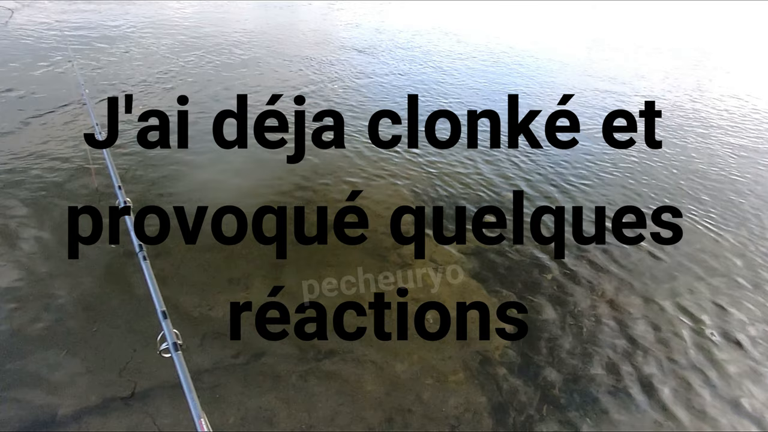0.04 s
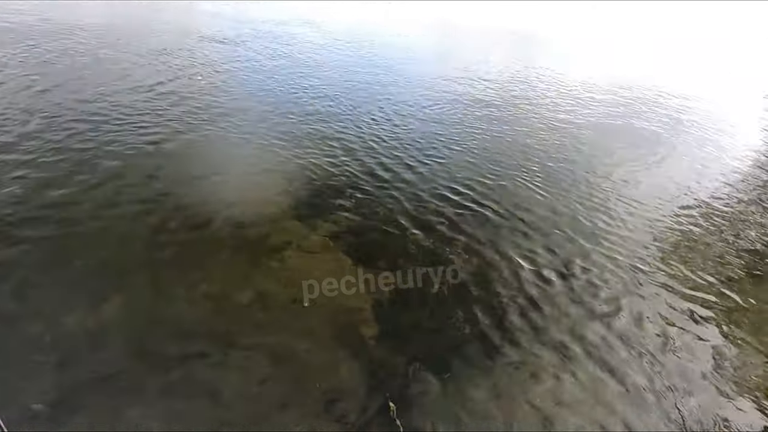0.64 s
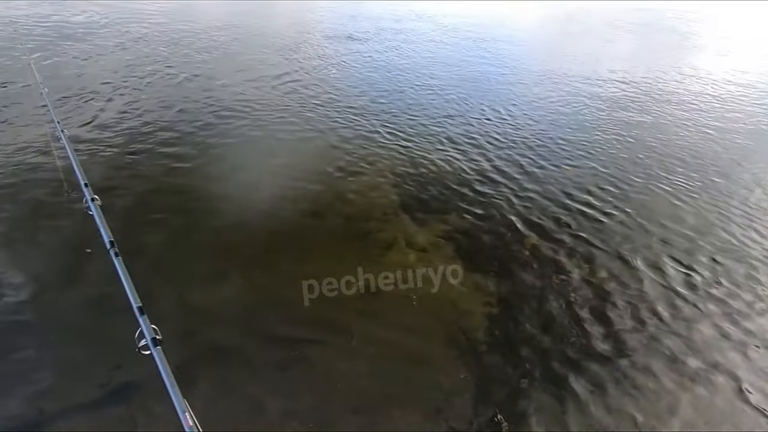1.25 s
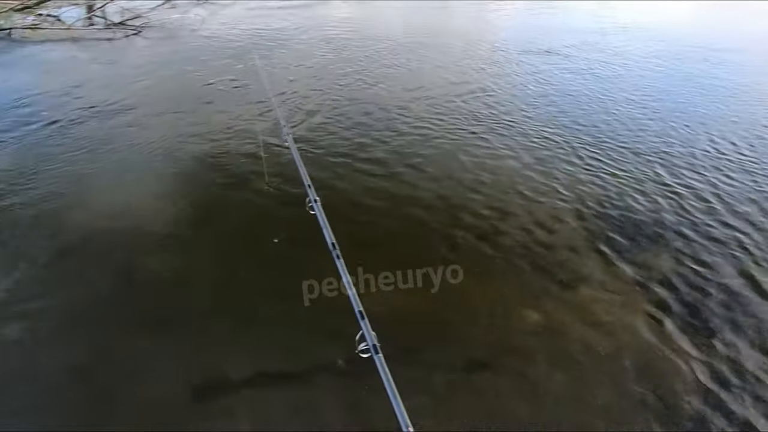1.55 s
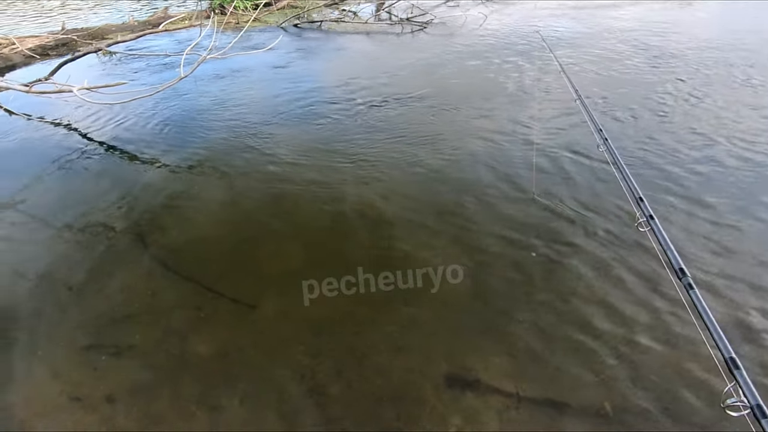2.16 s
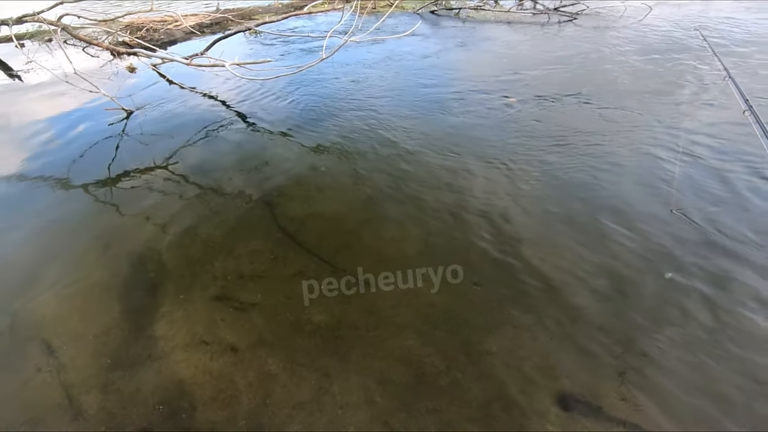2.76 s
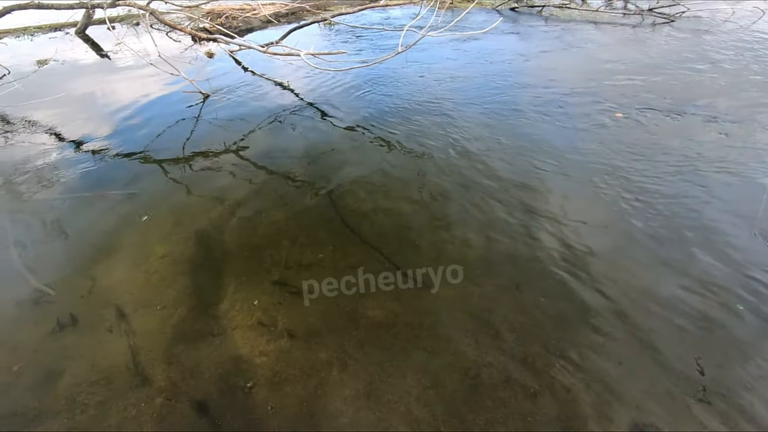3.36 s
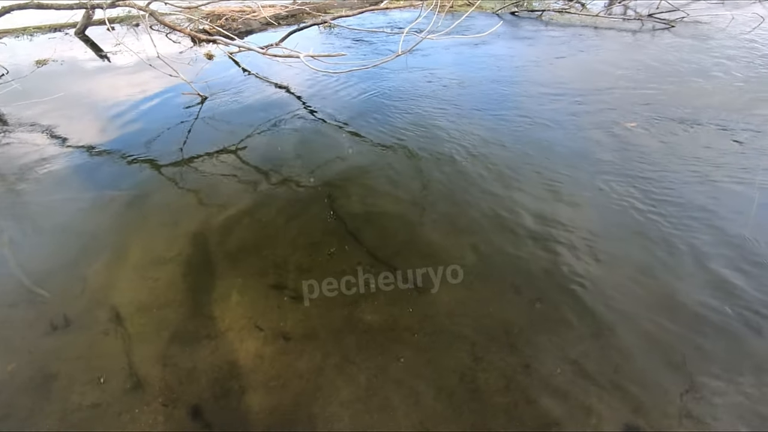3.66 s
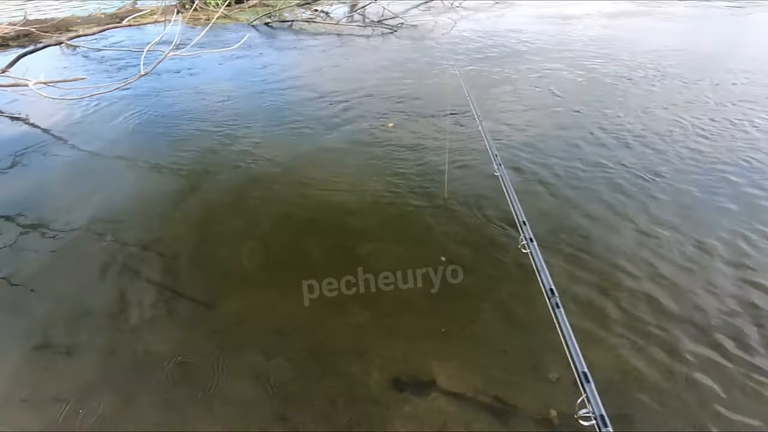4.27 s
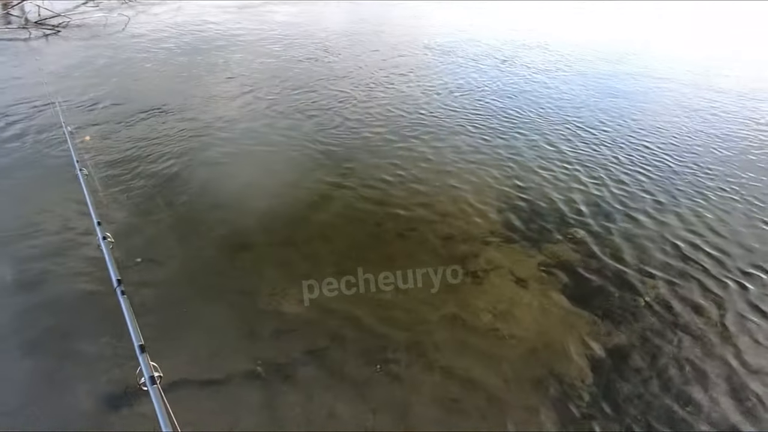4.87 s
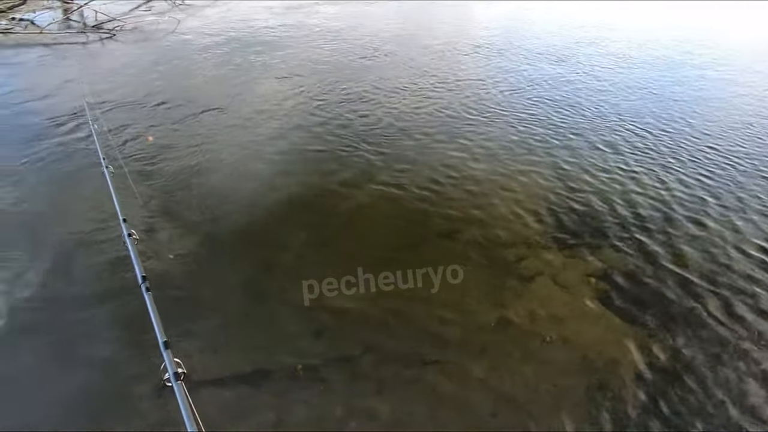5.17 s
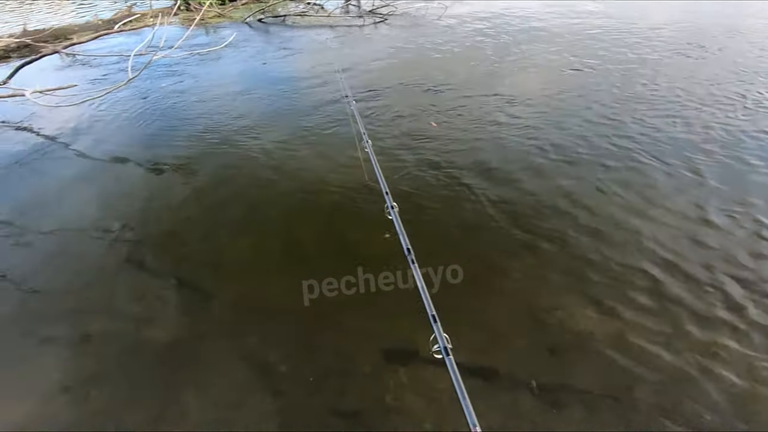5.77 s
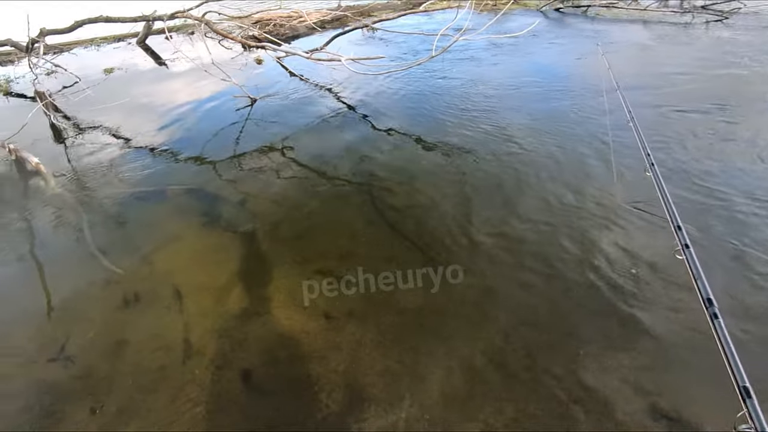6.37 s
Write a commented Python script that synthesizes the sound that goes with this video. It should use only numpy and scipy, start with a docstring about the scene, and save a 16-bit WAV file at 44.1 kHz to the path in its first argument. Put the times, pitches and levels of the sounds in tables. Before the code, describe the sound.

A fishing clonk strikes river water four times with loud, hollow pops and gurgles, over a steady current and light wind.

```python
"""A river rushes in after a brief silence, and gusts of wind brush the microphone on the bank.
Then a catfish clonk, a blade for luring fish, is struck into the water four times. Each time a low hum
swells into a crack, as a dragged-down pocket of air tears open and pinches off as a ringing bubble.
The water gurgles, drops fall back, and the bank gives a faint echo.
Every clonk overloads the microphone and makes its automatic volume control dip."""
import sys
import numpy as np
from scipy import signal
from scipy.fft import rfft, irfft, next_fast_len
from scipy.io import wavfile
from scipy.ndimage import uniform_filter1d

SR = 44100
rng = np.random.default_rng(int(sys.argv[2]) if len(sys.argv) > 2 else 0)


def unload_wav(signal):
    """Save mono or channel-first audio to the path in sys.argv[1] as 16-bit WAV at rate SR, clipped to [-1, 1]."""
    wavfile.write(
        sys.argv[1],
        SR,
        np.round(np.clip(np.atleast_2d(signal).T, -1, 1) * 32767).astype(np.int16),
    )


N = 291845
TIME = np.arange(N) / SR


def amp(db):
    """Turns decibels into a gain."""
    return 10 ** (np.asarray(db) / 20)


def unit(x):
    """Scales a signal to an average (rms) size of 1."""
    return x / np.sqrt(np.mean(x ** 2) + 1e-20)


def level_at(tone, hz):
    """Looks up the level in dB at each frequency of a tone table."""
    f, db = np.transpose(tone)
    return np.interp(np.log(hz + 1), np.log(f), db)


def add(mix, s, sound):
    """Mixes a sound in at s seconds."""
    part = mix[max(round(s * SR), 0):][:len(sound)]
    part += sound[:len(part)]


def noise(tone, size):
    """Noise of rms 1, coloured by a tone table."""
    hz = np.fft.rfftfreq(size, 1 / SR)
    phases = np.exp(2j * np.pi * rng.random(len(hz)))
    return unit(irfft(amp(level_at(tone, hz)) * phases, size))


# How loud the river's rush is over time, dipping near 2.6 s and 4.3 s: t/s, level/dB
RIVER_LEVELS = [(1.3, -28), (2.1, -29), (2.6, -33.5), (3.6, -30.5), (4.3, -35.5), (4.9, -29.5),
                (6.6, -28.5)]
# The tone of rushing water: f/Hz, level/dB
RIVER_TONE = [(25, -0.5), (110, -16), (150, 1), (205, 0), (290, -7), (450, -13.5), (600, -16), (740, -11.5),
              (1000, -17), (1350, -14.5), (2000, -16), (3100, -12.5), (4400, -17.5), (14000, -36)]
# How the microphone's small opening colours the treble: f/Hz, level/dB
MIC_TONE = [(4500, 0.5), (5800, -7.5), (7000, -1.5), (7500, -5.5), (8700, 0.5), (9600, -13.5), (10500, -4),
            (13400, -19.5), (14300, -24), (16500, -34)]


def river(patchy_db=1.15, lumpy_db=3.0, roar_hz=300):
    """The current rushes in drifting patches; its low roar comes in lumps."""
    frames, hz = N // 256 + 5, np.fft.rfftfreq(1024, 1 / SR)
    real, imag, patches = rng.standard_normal((3, frames, len(hz)))
    patches = uniform_filter1d(patches, size=14, axis=0)  # smooth over time
    patches = unit(uniform_filter1d(patches, size=12, axis=1))  # and over pitch
    lumps = unit(uniform_filter1d(rng.standard_normal(frames), size=14))
    roar = lumps[:, None] * np.exp(-(hz / roar_hz) ** 2)
    spectra = (real + 1j * imag) * amp(patchy_db * patches + lumpy_db * roar)
    rush = signal.istft(spectra.T, nperseg=1024, noverlap=768)[1][:N]
    size = next_fast_len(N)
    hz = np.fft.rfftfreq(size, 1 / SR)
    colour = amp(level_at(RIVER_TONE, hz) + level_at(MIC_TONE, hz))
    rush = irfft(rfft(rush, size) * colour, size)[:N]
    return unit(rush) * amp(np.interp(TIME, *np.transpose(RIVER_LEVELS)))


# Puffs of wind: t/s, spread/s, level/dB
GUSTS = [(.59, 0.048, -21.5), (.70, 0.018, -20), (1.70, .02, -29), (1.85, .019, -25), (4.62, 0.047, -22.5),
         (4.78, 0.07, -17), (5.16, 0.042, -26.5)]
# The tone of their rumble: f/Hz, level/dB
WIND_TONE = [(15, -10.5), (35, 1), (75, -3), (130, -20), (300, -29.5), (1000, -62), (4000, -90)]


def wind():
    """Each gust rumbles on the microphone, swelling and fading smoothly."""
    swells = sum(amp(db) * np.exp(-.5 * ((TIME - s) / spread) ** 2) for s, spread, db in GUSTS)
    return swells * noise(WIND_TONE, N)


def bubble(hz, t60, rise, onset_cycles=1.07):
    """A bubble rings, climbing by `rise` octaves a second and fading by 60 dB in t60 seconds."""
    t = np.arange(0, t60, 1 / SR)
    cycles = np.cumsum(hz * 2 ** (rise * t)) / SR
    onset = 1 - np.exp(-cycles / onset_cycles)
    return np.sin(2 * np.pi * cycles) * amp(-60 * t / t60) * onset


def wet_hiss(db, centre_hz, t60, octaves=0.28, onset_s=0.0012):
    """A short hiss of splashing water, coloured by the microphone's opening."""
    t = np.arange(4096) / SR
    hz = np.geomspace(100, SR / 2, num=80)
    band_db = level_at(MIC_TONE, hz) - 3 * np.log2(hz / centre_hz) ** 2 / octaves
    envelope = amp(db - 60 * t / t60) * (1 - np.exp(-t / onset_s))
    return envelope * noise(np.column_stack([hz, band_db]), len(t))


# Single bubbles that stand out: t/s, f/Hz, level/dB, rise/(octaves per s)
PLOPS = [(0.563, 1500, -22, 6.2), (.936, 510, -19, 29), (1.377, 1250, -2.5, 15), (1.426, 1530, -8, 18),
         (1.431, 2280, -4, 27), (1.548, 2340, -8, 8), (1.579, 322, -12.5, 2.6), (1.66, 805, -9.5, 24),
         (1.680, 427, -11, 19), (1.713, 424, -11.5, 16), (1.738, 472, -13.5, 30), (1.741, 820, -13, 22),
         (1.846, 1920, -13.5, 7.8), (2.357, 1020, -4.5, 4.2), (2.388, 1040, -11, 17), (2.401, 1350, -5, 7),
         (2.447, 1393, -10, 7.4), (2.451, 730, -11, 13), (2.47, 944, -11.5, 9), (2.487, 690, -12, 7.6),
         (2.555, 412, -11.5, 14.8), (3.117, 2400, -12.5, 8), (3.177, 1018, -8, 2.8),
         (3.209, 1135, -4.5, 9.9), (3.242, 705, -7.5, 5), (3.298, 593, -16, 1.8), (3.325, 602, -14, 2.2),
         (4.083, 954, -11.5, 12), (4.230, 695, -17, 1.4), (4.344, 2750, -20.5, 7), (4.4, 1420, -15, 20)]


def plops(waver=0.51, waver_hz=90, tick_db=-17.0):
    """Each larger bubble breaks off with a wet tick and rings; the heaving surface makes it waver."""
    out = np.zeros(N)
    for s, hz, db, rise in PLOPS:
        # higher or faster-rising notes die sooner
        t60 = 0.048 * (hz / 1000) ** -0.76 * (max(rise, 1) / 10) ** -0.25
        add(out, s, amp(db) * bubble(hz, t60, rise))
        add(out, s, wet_hiss(db + tick_db, 2 * hz, t60=0.015))
    heave = noise([(waver_hz, 0), (waver_hz * 4, -40), (SR, -120)], N)
    return out * (1 + waver * heave)


def bank_echo(sound, echo_db=-27, t60=0.74, delay_s=0.0324, band_hz=(300, 900)):
    """The bank and its trees scatter a faint, dull echo."""
    t = np.arange(SR // 2) / SR
    echoes = rng.standard_normal(len(t)) * amp(-60 * t / t60) * (t > delay_s)
    dull = signal.butter(1, band_hz, "bandpass", fs=SR, output="sos")
    echoes = signal.sosfilt(dull, echoes / np.linalg.norm(echoes))
    return amp(echo_db) * signal.fftconvolve(sound, echoes)[:N]


# One row a stroke: crack t/s, blade's head start/s, wait until pinch-off/s,
# hum level/dB, hum f/Hz, crack level/dB, spray level/dB,
# then the sealed bubble's start f/Hz, target f/Hz, glide/s, t60/s, life/s
STROKES = [(1.3606, 0.036, 0.007, 13, 157, 3, -19, 251.6, 952, 0.16, 0.14, 0.088),
           (2.1727, 0.039, .0096, 17, 145.6, 10.5, -18, 308, 633, 0.027, 0.099, 0.057),
           (3.0050, .025, .0184, 12, 136, 10, -19, 264, 560, 0.0048, 0.052, 0.025),
           (3.8468, 0.034, 0.0091, 18, 144, 8.5, -11, 308, 646, 0.027, 0.099, 0.034)]


def strokes(shed_after_s=.043, shed_db=-7):
    """The blade hisses into the water, the air pocket clonks, then it sheds a second bubble."""
    out = np.zeros(N)
    for s, lead_s, *shape in STROKES:
        add(out, s - lead_s, wet_hiss(db=-22, centre_hz=4200, t60=0.049, octaves=0.42))
        t = np.arange(-.08, .25, 1 / SR)  # zero is the moment of the crack
        add(out, s + t[0], clonk(t, *shape))
        add(out, s + shed_after_s, amp(shed_db) * bubble(hz=400, t60=0.082, rise=12))
    return out


def low_hum(t, hz, swell_s=0.0054, overtone=0.224, overtone_ratio=2.03):
    """A low hum near 146 Hz, with a weaker overtone, swells into each crack."""
    angle = 2 * np.pi * hz * t
    notes = np.cos(angle) - overtone * np.cos(overtone_ratio * angle)
    return notes / (1 + np.exp(-t / swell_s))


# The tone of the air pocket tearing open: f/Hz, level/dB
CRACK_TONE = [(100, 7), (550, 2), (1300, -2), (3000, -8), (6000, -22), (14000, -50)]
# The tone of the spray around the crack: f/Hz, level/dB
SPRAY_TONE = [(150, 19.5), (600, 5.5), (1500, 3), (3500, -0.5), (7000, -10.5), (12500, -23), (15000, -42)]


def clonk(t, pinch_s, hum_db, hum_hz, crack_db, spray_db, *ring_shape, spray_s=0.015, churn_db=-12):
    """A hum swells; the air pocket cracks open with churn and spray and closes into a ringing bubble."""
    age = np.maximum(t - pinch_s, 0)
    until_pinch = np.exp(-(age / 0.00046) ** 2)
    hum = amp(hum_db) * low_hum(t, hum_hz)
    churn = amp(crack_db + churn_db) * noise(CRACK_TONE, len(t)) * (t > 0)
    spray = amp(spray_db) * noise(SPRAY_TONE, len(t)) * np.exp(-.5 * (t / spray_s) ** 2)
    sound = (hum + churn + spray) * until_pinch + sealed_bubble(age, *ring_shape)
    size = 240  # the crack lasts about 5 ms
    crack = amp(crack_db) * noise(CRACK_TONE, size) * signal.windows.tukey(size, .5)
    add(sound, -t[0] - size / 2 / SR, crack)
    return sound


def sealed_bubble(age, start_hz, target_hz, glide_s, t60, life_s, db=11.5, snap_db=12, snap_s=0.0035):
    """Trapped air snaps into a note that climbs as it nears the surface and stops when it gets there."""
    hz = target_hz + (start_hz - target_hz) * np.exp(-age / glide_s)
    ring = -np.sin(2 * np.pi * np.cumsum(hz * (age > 0)) / SR)
    underwater = np.exp(-(age / life_s) ** 4)
    snap = np.exp(-(age / snap_s) ** 2)
    return ring * underwater * amp(db - 60 * age / t60 + snap_db * snap)


def swarm(s, spread_s, band_hz, cycles, rise, scatter_db, linger_db, count):
    """Small bubbles crowd around time s; the smaller ones are higher, shorter and fainter."""
    out = np.zeros(N)
    low_hz, high_hz = band_hz
    for when, smallness, strength, glide in rng.random((count, 4)):
        offset = 3.5 * (2 * when - 1)  # up to 3.5 spreads early or late
        hz = low_hz * (high_hz / low_hz) ** smallness
        gain = amp(scatter_db * (2 * strength ** 2 - 0.5) - 3.6 * smallness)
        swell = np.exp(-.5 * offset ** 2) + amp(linger_db)
        add(out, s + offset * spread_s, gain * swell * bubble(hz, cycles / hz, 2 * glide * rise))
    return out


def foam(db=-21, after_s=.08):
    """Foam seethes in the wake of each stroke."""
    return amp(db) * sum(swarm(s + after_s, spread_s=0.036, band_hz=(535, 2980), cycles=19.6, rise=15,
                               scatter_db=5.5, linger_db=-5, count=120) for s, *_ in STROKES)


# The water closing after each stroke: t/s, gulp level/dB, lowest gulp f/Hz
GURGLES = [(1.689, -19, 288), (2.43, -18.5, 367), (3.249, -21.5, 475), (4.12, -25, 379)]


def gurgles(spread_s=0.057, patter_db=-16.5, mist_db=-33, mist_after_s=0.14):
    """The water closes, gulping and pattering; the finest drops land last."""
    out = np.zeros(N)
    for s, gulp_db, low_hz in GURGLES:
        gulp = swarm(s, spread_s, band_hz=(low_hz, 1815), cycles=22.8, rise=18,
                     scatter_db=5.5, linger_db=-19, count=170)
        patter = swarm(s, spread_s, band_hz=(1106, 5210), cycles=21.5, rise=7,
                       scatter_db=1.5, linger_db=-17.5, count=200)
        mist = swarm(s + mist_after_s, spread_s=0.091, band_hz=(4360, 11100), cycles=16, rise=3,
                     scatter_db=1.5, linger_db=-1.5, count=260)
        out += amp(gulp_db) * gulp + amp(patter_db) * patter + amp(mist_db) * mist
    return out


# The larger slops of spray: t/s, level/dB, centre f/Hz
SPLASHES = [(1.661, -23, 2300), (2.375, -17, 2530), (2.549, -23.5, 3330), (3.295, -17.5, 1900),
            (3.402, -16, 3640), (3.436, -13.5, 3620), (3.524, -24.5, 5800), (4.228, -14, 1390)]


def splashes():
    """Spray falls back and hits the river with short hisses."""
    out = np.zeros(N)
    for s, db, hz in SPLASHES:
        add(out, s, wet_hiss(db, hz, t60=0.039))
    return out


def scene():
    """The strokes, the stirred water and their echo, over river and wind."""
    water = strokes() + plops() + foam() + gurgles() + splashes()
    return (water + bank_echo(water) + river() + wind())[None]


def hold_peaks(over_db, release_s):
    """Holds each peak and lets it die away."""
    fade = np.exp(-TIME / release_s)
    return np.maximum.accumulate(over_db / fade) * fade


def record(dry, threshold_db=-6, depth_db=19.5, slow_share=0.35, attack_s=0.016,
           start_s=.479, top_hz=16500):
    """The volume dips too late for each clonk, which distorts; it recovers fast at first, then slowly."""
    sound = dry[0] * (TIME > start_s)
    over_db = np.clip(20 * np.log10(abs(sound) + 1e-9) - threshold_db, 0, depth_db)
    quick_db = hold_peaks(over_db, release_s=0.24)
    slow_db = hold_peaks(over_db, release_s=3)
    dip_db = (1 - slow_share) * quick_db + slow_share * slow_db
    lag = np.exp(-1 / (attack_s * SR))
    late_dip_db = signal.lfilter([1 - lag], [1, -lag], dip_db)
    overloaded = np.clip(sound * amp(-late_dip_db), -1, 1)
    treble_cut = signal.firwin(255, top_hz, window=("kaiser", 9), fs=SR)
    return signal.oaconvolve(overloaded, treble_cut, "same")[None]


dry = scene()
out = record(dry)
unload_wav(out)
```